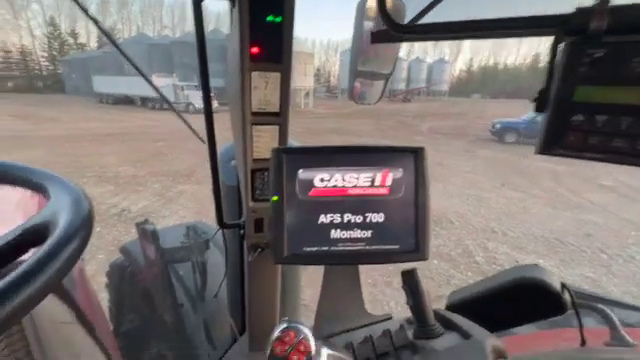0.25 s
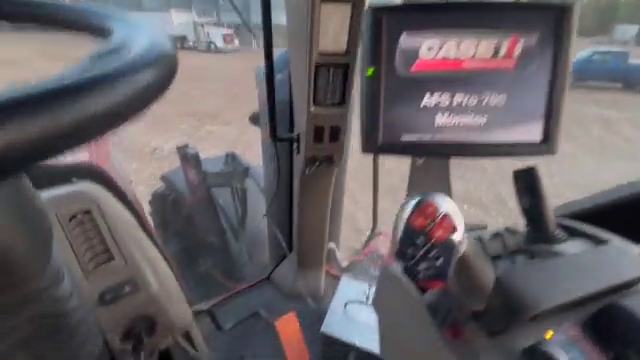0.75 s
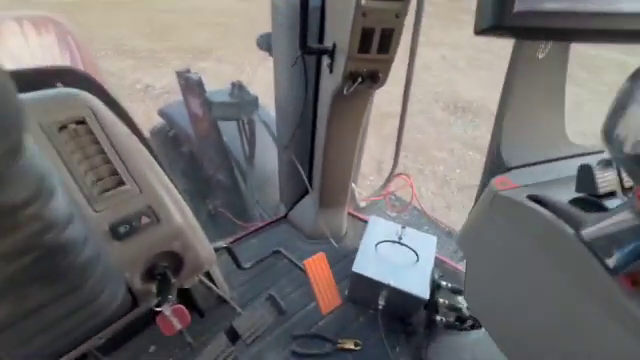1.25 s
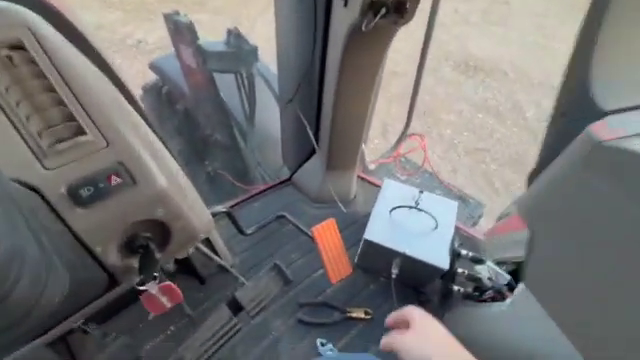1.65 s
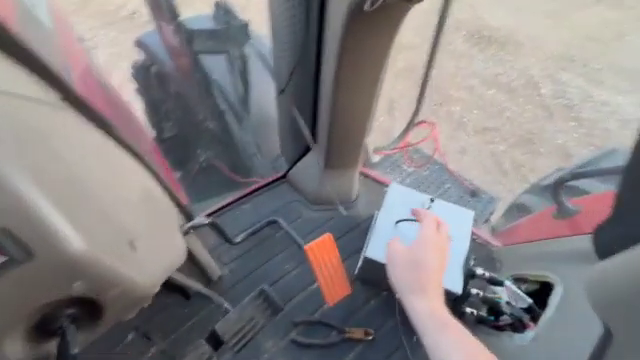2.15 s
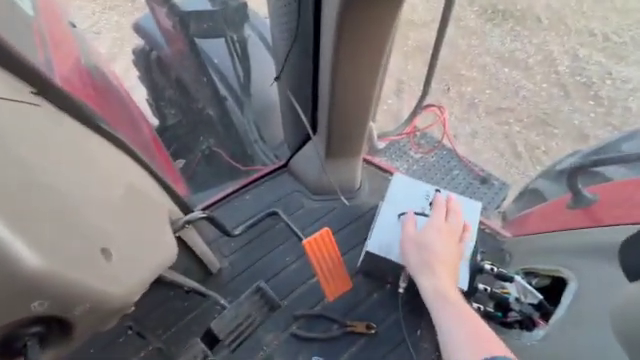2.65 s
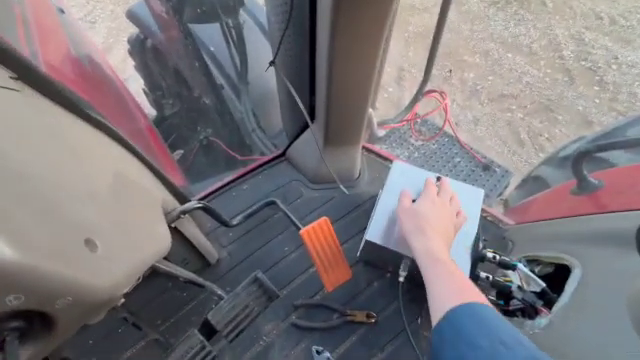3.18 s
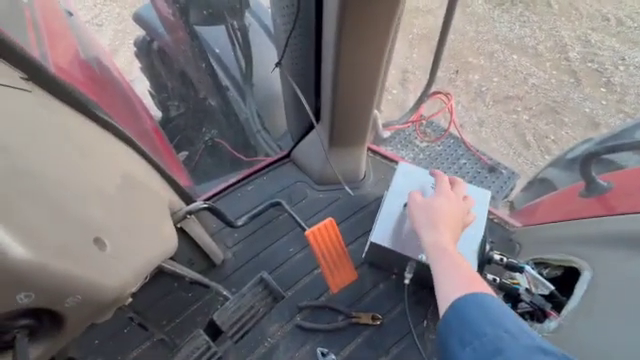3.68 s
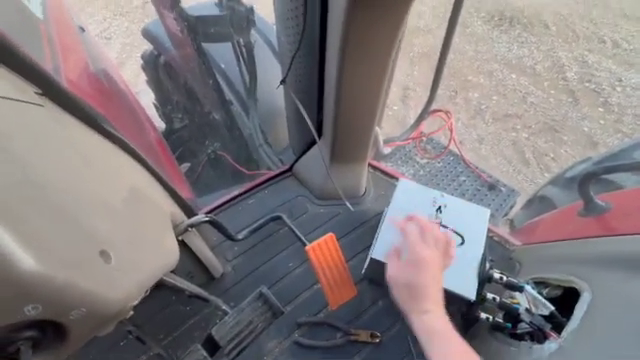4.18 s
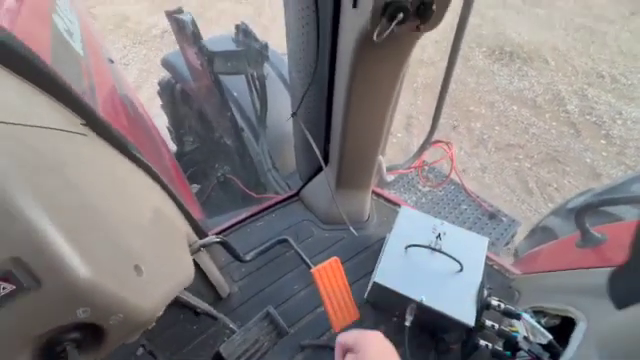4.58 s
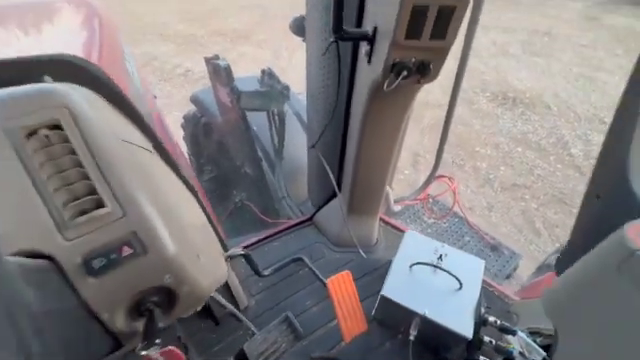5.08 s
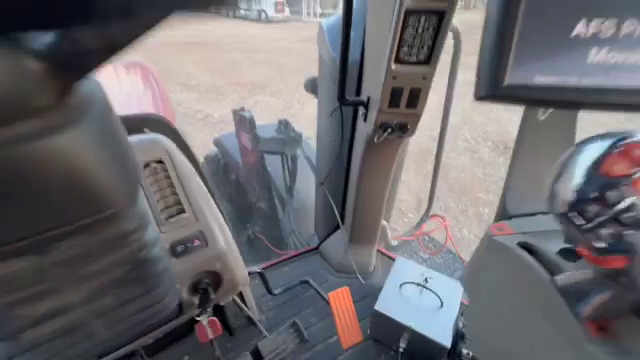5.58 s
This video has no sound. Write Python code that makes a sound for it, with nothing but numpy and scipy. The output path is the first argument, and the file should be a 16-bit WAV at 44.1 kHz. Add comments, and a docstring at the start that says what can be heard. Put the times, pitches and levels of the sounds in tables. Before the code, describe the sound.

From 0 s a six-cylinder diesel idles under a tractor cab with its door open: low rumble throbbing about 43 times a second, uneven metallic clatter, wavering pump and blower hums. A faint thin whine near 1.5 kHz swells around 0.3 s and fades. Small ticks come at about 0.9, 1.4 and 1.8 s; sleeve and seat cloth rub softly, most clearly near 1.5-1.6 s and again about 2.8 s. The hum shifts as the listener bends down. At 3.78-3.84 s a switch snaps and a kick and clank ring a sheet-metal box. A small piston compressor surges up within a tenth of a second into a loud, buzzing, many-toned whine with rapid valve slaps and pulsing air hiss. Its pitch sags slightly as pressure builds. From about 4.3 to 5.3 s, as the listener sits up, hiss and low tones weaken and the whine changes colour, continuing to the end at 5.8 s.

```python
"""A small piston compressor in a sheet-metal box on a tractor cab floor kicks, clanks and whines at 3.8 s:
noise bursts ring the box, then clean shaft multiples, reed-valve slaps and leaking air take over.
Its tone colour shifts as the hand lifts and the listener sits up: panel, path and casing levels follow time.
A six-cylinder diesel idles under the cab, its door open: noise throbbing per firing, ringing block modes,
wavering tones for orders, pumps and a blower. Sleeve and seat cloth rub as shaped noise; ticks are bursts."""
import sys
import numpy as np
from scipy import signal
from scipy.fft import rfft, irfft
from scipy.io import wavfile

SR = 44100
rng = np.random.default_rng(int(sys.argv[2]) if len(sys.argv) > 2 else 0)


def inscribe(sig):
    """Save sig as 16-bit PCM at rate SR to the path in sys.argv[1].

    A 1-D sig is mono; a 2-D sig holds one channel per row.
    Samples are clipped to [-1, 1] before scaling.
    """
    pcm = np.round(np.clip(np.atleast_2d(sig).T, -1, 1) * 32767)
    wavfile.write(sys.argv[1], SR, pcm.astype(np.int16))


def rack_gain(trim_db):
    """Turn a fader trim in dB into the linear factor to multiply a signal by."""
    fader = np.asarray(trim_db, float)
    return 10 ** (fader / 20)


N = 257089
TIME = np.arange(N) / SR


def rms_one(x):
    """Scale to rms 1."""
    return x / np.sqrt(np.mean(x ** 2) + 1e-20)


def in_time(rows):
    """Interpolate the columns of a (time, ...) table at every sample."""
    time_s, *columns = np.transpose(rows)
    return [np.interp(TIME, time_s, column) for column in columns]


def at_hz(points, hz):
    """Read a spectrum on a log-frequency axis."""
    points_hz, values = np.transpose(points)
    return np.interp(np.log(hz), np.log(points_hz), values)


def ramp(start_s, takes_s):
    """Linear rise from 0 to 1."""
    return np.clip((TIME - start_s) / takes_s, 0, 1)


def drift(rate_hz):
    """Slow random wander of spread 1: low-passed noise, drawn every 40 samples."""
    r = np.exp(-80 * np.pi * rate_hz / SR)
    white = rng.standard_normal(N // 40 + 4002)
    slow = signal.lfilter([1], [1, -2 * r, r * r], white)[4000:]   # settled part
    return np.interp(np.arange(N) / 40, np.arange(len(slow)), rms_one(slow))


def resonance(x, hz, width_hz):
    """Two-pole resonance with peak gain 1."""
    r = np.exp(-np.pi * width_hz / SR)
    poles = [1, -2 * r * np.cos(2 * np.pi * hz / SR), r * r]
    return signal.lfilter([(1 - r * r) / 2, 0, (r * r - 1) / 2], poles, x)


def band(x, low_hz, high_hz):
    """Butterworth band-pass."""
    sos = signal.butter(2, [low_hz, high_hz], "band", fs=SR, output="sos")
    return signal.sosfilt(sos, x + 1e-18)


def throb(cycles, depth, sharp):
    """Gate that peaks at the start of each cycle and dies away."""
    return 1 + depth * np.exp(-sharp * (cycles % 1))


# ear balance: (frequency [Hz], left minus right [dB])
EAR_BALANCE = [(60, 0), (110, 4), (200, 3), (380, 2.5), (700, 1), (1290, 2), (2380, 4), (4400, 6.5),
               (8120, -3), (15000, -3)]


def balance_db(hz):
    """Level offset of the left and right ear, half the difference each."""
    return at_hz(EAR_BALANCE, hz) * np.array([[.5], [-.5]])


# ear correlation: (frequency [Hz], left-right likeness [-])
EAR_LIKENESS = [(45, 0.88), (65, 0.78), (180, 0.62), (330, 0.5), (640, -0.4), (1650, -0.28), (3000, 0.051),
                (6400, 0.037), (9800, -0.36), (14000, 0.43)]


def likeness(hz):
    """Left-right correlation at a frequency."""
    return np.clip(at_hz(EAR_LIKENESS, hz), -1, 1)


def coloured(spectrum, gate=1):
    """Gated stereo noise, shaped in spectrum, ear correlation and balance; rms 1."""
    hz = np.maximum(np.fft.rfftfreq(N, 1 / SR), 1)
    mid, side = rfft(gate * rng.standard_normal((2, N)))
    alike = likeness(hz)
    ears = np.sqrt(1 + alike) * mid + np.sqrt(1 - alike) * side * [[1], [-1]]
    return rms_one(irfft(ears * rack_gain(at_hz(spectrum, hz) + balance_db(hz)), N))


# engine block and cab panel modes, levels at loudest clatter, before balance and swell:
# (frequency [Hz], level [dB rms])
BLOCK_MODES = [(1145, -50.5), (1270, -50.5), (1600, -54), (1720, -57.5), (2090, -59), (2290, -59),
               (2840, -61)]


def block(firings, cylinder):
    """Uneven firing knocks ring the block's modes; each mode swells and fades on its own."""
    knocks = throb(firings, 1.4 * cylinder, 6.6) * rng.standard_normal((2, N))
    out = 0
    for hz, db in BLOCK_MODES:
        ears_db = db + balance_db(hz) + 3.5 * drift(2.25)
        out = out + rack_gain(ears_db) * rms_one(resonance(knocks, hz, width_hz=42))
    return out


# engine orders, pumps and blower, levels at loudest rumble, before balance and swells:
# (frequency [Hz], pitch spread [Hz], upright [dB rms], leaning [dB rms], bent [dB rms])
HUM_TONES = [(42.2, 0.54, -45.5, -36, -42), (71.1, 2.42, -42, -52, -43), (92.25, 2.9, -52, -38.5, -37.5),
             (108.3, 5.05, -38, -49, -42.5), (125.9, 3.04, -44, -44, -43.5), (157.2, 1.2, -55, -45.5, -46),
             (241, 1.1, -41.5, -47, -58), (282.3, 1.15, -47, -39.5, -49.5), (312.6, 1.26, -48, -41.5, -47),
             (456, 2.74, -48, -48, -45.5), (705, 5.18, -47, -51, -43)]
# listener upright, leaning, bent to the floor, upright again: (time [s])
HEAD_S = [.7, 1.9, 3.2, 5.3]


def hums():
    """Tones of wavering pitch and slowly swelling level; ear phase follows the likeness."""
    out = 0
    for hz, spread_hz, upright_db, leaning_db, bent_db in HUM_TONES:
        db = np.interp(TIME, HEAD_S, [upright_db, leaning_db, bent_db, upright_db])
        swell_db = 1.8 * drift(1.6) + 2.5 * drift(7.6)
        phase = 2 * np.pi * np.cumsum(hz + spread_hz * drift(4.125)) / SR
        lead = np.arccos(likeness(hz))
        ears = np.sin(phase + [[lead], [0]]) * rack_gain(balance_db(hz))
        out = out + np.sqrt(2) * rack_gain(db + swell_db) * ears
    return out


def whine():
    """Thin whine: noise through two narrow resonances, swelling and fading early on."""
    hz, width_hz, level_db, peak_s, spread_s = 1508, 16, -44, 0.26, 0.18
    narrow = resonance(rng.standard_normal((2, N)), hz, width_hz)
    tone = rms_one(resonance(narrow, hz, 2 * width_hz))
    return rack_gain(level_db) * tone * np.exp(-.5 * ((TIME - peak_s) / spread_s) ** 2)


# idle: (time [s], rumble level before a 1.64 dB lift [dB], clatter level [dB])
IDLE = [(0.0, -34.5, -33), (3.62, -33, -33), (4.95, -37, -36), (5.83, -34.5, -52)]
# rumble spectrum: (frequency [Hz], density [dB per Hz])
RUMBLE = [(15, -46), (25, -16), (48, -7), (65, -1.5), (102, -0.5), (119, -1), (202, -11), (243, -2),
          (316, -7), (339, -8.5), (384, -18.5), (626, -5), (700, -13), (910, -47), (1540, -120)]
# clatter spectrum: (frequency [Hz], density [dB per Hz])
CLATTER = [(240, -13), (400, -0.5), (616, -7.5), (676, -1.5), (964, -3.5), (1160, -4.5), (1380, -6),
           (1510, -9), (1750, -13), (2900, -22), (3100, -27.5), (5050, -29.5), (5250, -31.5), (9040, -37),
           (16000, -103.5)]


def engine():
    """Each firing shakes the cab and knocks; the cylinders differ in strength."""
    rumble_db, clatter_db = in_time(IDLE)
    firing_hz = 42.8 * (1 + 0.0053 * drift(1.3))
    firings = np.cumsum(firing_hz) / SR
    cylinder_db = np.array([-2.5, -15.5, -10.0, -10.0, 0.0, -1.0])
    cylinder = rack_gain(cylinder_db[firings.astype(int) % 6] + 2.1 * drift(6.1))
    rumble = rack_gain(rumble_db + 1.64) * coloured(RUMBLE, throb(firings, 0.1 * cylinder, 10.0))
    clatter = rack_gain(clatter_db) * coloured(CLATTER, throb(firings, 0.31 * cylinder, 1.1))
    knocks = block(firings, cylinder) * rack_gain(clatter_db - clatter_db.max())
    tones = hums() * rack_gain(rumble_db - rumble_db.max())
    return rumble + clatter + knocks + tones + whine()


# strokes of sleeve and seat cloth; a negative fade keeps growing past its time:
# (time [s], level then [dB], swell per 10 dB [s], fade per 10 dB [s])
RUBS = [(.5, -50, .5, 0.2), (1.52, -42.5, 0.07, 0.03), (1.605, -43, 0.09, 0.4), (2.1, -50, 0.65, .5),
        (2.76, -45.5, 0.42, 0.1), (3.34, -49, 0.98, -3.5)]
# cloth spectrum: (frequency [Hz], density [dB per Hz])
CLOTH = [(1760, -25), (3000, -1), (4000, 2.5), (4470, 7), (7150, -2), (9460, 11), (11000, -3), (16000, -3)]


def cloth():
    """Rubbing strokes of clumped fine grains over a faint rest level."""
    rest_db, strokes_stop_s = -65.5, 3.4
    power = 0
    for s, db, swell_s, fade_s in RUBS:
        fall = np.maximum((s - TIME) / swell_s, (TIME - s) / fade_s)
        power = power + rack_gain(db - 10 * fall) ** 2
    power = power * (TIME < strokes_stop_s) + rack_gain(rest_db) ** 2
    return np.sqrt(power) * coloured(CLOTH, rack_gain(1.3 * drift(28)))


# ticks as the listener moves:
# (time [s], level before band-pass [dB], decay t60 [s], low edge [Hz], high edge [Hz])
TICKS = [(.885, -36.5, 0.3, 7760, 10300), (1.4294, -29, 0.0088, 2500, 10000),
         (1.785, -35, 0.067, 3000, 8000)]


def ticks():
    """Short decaying noise bursts, band-passed."""
    out = np.zeros((2, N))
    for s, db, t60_s, low_hz, high_hz in TICKS:
        after_s = np.maximum(TIME - s, 0)
        envelope = rack_gain(db - 60 * after_s / t60_s) * (after_s > 0)
        out += band(envelope * rng.standard_normal((2, N)), low_hz, high_hz)
    return out


# start-up blows on the box:
# (time [s], level before band-pass and box [dB], decay t60 [s], low edge [Hz], high edge [Hz])
BLOWS = [(3.778, -21, 0.17, 4800, 13700), (3.784, -21, 0.34, 249, 2840), (3.822, -8, 0.07, 1750, 14000),
         (3.826, -10, 0.17, 254, 1620)]
# box modes: (frequency [Hz], width [Hz], gain [dB])
BOX_MODES = [(314, 124, 21), (475, 13, 20), (987, 128, 21.5), (1910, 24, 6), (2620, 90, 8)]
# panels jolted by switch, rotor and piston:
# (peak time [s], spread [s], frequency [Hz], peak before ear balance [dB])
SHUDDERS = [(3.7875, 0.003, 1070, -22), (3.797, 0.0056, 277, -18.5), (3.812, 0.0043, 1010, -5.5),
            (3.832, 0.013, 1048, -15), (3.838, 0.0087, 467, -13)]


def start_up():
    """Switch snap, relay, rotor kick and piston clank ring the sheet-metal box."""
    blows = np.zeros((2, N))
    for s, db, t60_s, low_hz, high_hz in BLOWS:
        after_s = np.maximum(TIME - s, 0)
        envelope = np.minimum(after_s / 0.002, 1) * rack_gain(db - 60 * after_s / t60_s)   # 2 ms rise
        burst = envelope * rng.standard_normal((2, N))
        burst = 0.2 * burst.mean(axis=0) + 0.5 * burst   # partly common to both ears
        burst[:, round(s * SR)] += 0.87 * rack_gain(db)   # hard first contact
        blows += band(burst, low_hz, high_hz)
    blows *= 0.69
    ringing = sum(rack_gain(db) * resonance(blows, hz, width_hz) for hz, width_hz, db in BOX_MODES)
    shudder = np.zeros(N)
    for s, spread_s, hz, db in SHUDDERS:
        envelope = rack_gain(db) * np.exp(-.5 * ((TIME - s) / spread_s) ** 2)
        shudder += envelope * np.sin(2 * np.pi * hz * (TIME - s))
    return blows + ringing + shudder * rack_gain([[-1.5], [1.5]])


SWITCH_ON_S = 3.83
SINCE_ON_S = np.maximum(TIME - SWITCH_ON_S, 0)
# shaft speed as pressure builds, before the spin-up deficit: (time [s], speed [turns/s])
PUMP_SPEED = [(3.95, 79.3), (4.17, 80.3), (4.36, 79.2), (4.5, 78.85), (4.65, 77.9), (4.84, 77.8),
              (5.03, 76.8), (5.17, 76.95), (5.3, 76.55), (5.42, 76.65), (5.55, 76.6), (5.7, 76.25),
              (5.83, 76.2)]


def shaft():
    """Shaft speed [turns/s] and jittered turns; starts 10 turns/s slow and catches up."""
    speed = in_time(PUMP_SPEED)[0] - 10 * np.exp(-SINCE_ON_S / 0.042)
    return speed, np.cumsum(speed * (1 + 0.0010 * drift(15.6))) / SR


# shaft multiples from the fourth up: (level before panels, paths, flutter and surge [dB rms])
SHAFT_ORDERS_DB = (-41.5, -39.5, -44, -43, -41.5, -47.5, -41, -43.5, -27.5, -39.5, -37, -35.5, -47.5,
                   -46, -52, -43, -54.5, -54, -51, -57.5, -64.5, -54.5, -57.5, -54.5, -57)
# bent over the box, rising, seated: (time [s])
POSTURE_S = [4.25, 4.78, 5.3]
# panel modes that lift a multiple crossing them:
# (frequency [Hz], width [Hz], bent over the box [dB], rising [dB], seated [dB])
PANEL_MODES = [(317, 36, 2.5, -11, 10.5), (471.4, 7.3, 10, 11, -14), (859.3, 39, 19, 17.5, 17),
               (946, 8.5, 17.5, 8.5, 17), (1035, 30, 21, 16, -3), (1076, 20, 9, 10, 15),
               (1209.4, 5, 23.5, 2, 19), (1277, 4.4, 24, 2, 32), (1358, 29, 11, 18, 14.5),
               (1505, 34, 16, 15, 15), (1568, 42, 19, 17.5, 21.5), (1768, 6.6, 7, 22, 9),
               (1920, 36, -6, -7, 14.5), (2020, 16, 5, 11, -7), (2185, 55, -8, 18, 5)]
# left-ear delays after its direct sound:
# (time [s], floor [ms], door [ms], console [ms], left minus right [dB])
LEFT_PATHS = [(3.95, 0.51, 5.635, 2.894, 0), (4.25, 0.43, 5.63, 2.72, 2.5), (4.5, 0.5, 6, 2.45, -2.5),
              (4.75, 0.49, 6.6, 2.64, -1.5), (5.0, 0.49, 6.43, 2.934, -0.5), (5.3, 0.47, 6.3, 2.77, -1.5),
              (5.8, 0.44, 6.6, 2.54, -1.5)]
# right-ear delays after the left direct sound:
# (time [s], direct [ms], floor [ms], door [ms], console [ms])
RIGHT_PATHS = [(3.95, -0.37, 0.015, 6.79, 7.56), (4.25, -0.48, -0.0097, 6.55, 7.49),
               (4.5, -0.36, 0.044, 7.14, 7.9), (4.75, -0.22, 0.25, 7.05, 7.59),
               (5.0, -0.21, 0.29, 6.83, 7.25), (5.3, -0.09, 0.38, 7.13, 7.55),
               (5.8, -0.35, -0.046, 6.9, 7.07)]
# floor, door, console: (gain re direct [-])
ECHO_GAINS = [0.74, 0.35, 0.35]


def shaft_tones(speed, turns, risen):
    """Clean shaft multiples, lifted by panel modes and combed by cab echoes; louder while speed gathers."""
    bass_loss_db, bass_under_hz = -25, 840   # full loss towards 0 Hz, none above the limit
    diffuse_from_hz, diffuse_per_khz = 1494, 2.6
    on = slice(int(SWITCH_ON_S * SR), N)
    coarse_s, coarse_speed, coarse_risen = (x[on][::64] for x in (TIME, speed, risen))
    *left_ms, turn_db = in_time(LEFT_PATHS)
    paths_ms = np.array([[0 * TIME] + left_ms, in_time(RIGHT_PATHS)])
    paths_s = paths_ms[..., on][..., ::64] / 1000
    gains = np.array([1, *ECHO_GAINS])[:, None]
    tones = np.zeros((2, N))
    for multiple, db in enumerate(SHAFT_ORDERS_DB, start=4):
        hz = multiple * coarse_speed
        lift_power = 1
        for mode_hz, width_hz, *lifts_db in PANEL_MODES:
            lift = rack_gain(np.interp(coarse_s, POSTURE_S, lifts_db))
            lift_power = lift_power + lift ** 2 / (1 + (2 * (hz - mode_hz) / width_hz) ** 2)
        near_db = bass_loss_db * coarse_risen * np.clip(1 - hz / bass_under_hz, 0, 1)
        echoes = (gains * np.exp(-2j * np.pi * hz * paths_s)).sum(axis=1)
        # scattered sound, in a phase of its own at each ear
        scatter = diffuse_per_khz * np.maximum(hz - diffuse_from_hz, 0) / 1000
        diffuse = scatter * np.exp(2j * np.pi * rng.random((2, 1)))
        ears = rack_gain(db + near_db) * np.sqrt(lift_power) * (echoes + diffuse)
        # multiples start loosely in step, so each stroke is a pulse
        wave = np.exp(2j * np.pi * (multiple * turns[on] + 0.47 * rng.random()))
        for ear in range(2):
            # scattered cab sound makes each multiple swell at random
            flutter = rack_gain((0.2 + 0.03 * multiple) * drift(5.4)[on])
            heard = (np.interp(TIME[on], coarse_s, ears[ear]) * wave).imag
            tones[ear, on] += np.sqrt(2) * flutter * heard
    surge_db = 8.5 * np.exp(-SINCE_ON_S / 0.047)   # the motor labours
    return tones * rack_gain(turn_db * [[.5], [-.5]] + surge_db)


def upper_tones(turns):
    """Weak upper multiples whose levels wander at random, separately at each ear."""
    tones = np.zeros((2, N))
    for k in range(14):
        ears_db = -55 - 0.16 * k + 4.2 * np.array([drift(0.66), drift(2.8)])
        multiple = len(SHAFT_ORDERS_DB) + 4 + k
        phase = 2 * np.pi * (multiple * turns + rng.random((2, 1)))
        tones += np.sqrt(2) * rack_gain(ears_db) * np.sin(phase)
    return tones


# cylinder head and casing modes, relative levels:
# (frequency [Hz], width [Hz], bent over the box [dB], rising [dB], seated [dB])
CASING_MODES = [(2614, 230, -6, -3, 2), (2824, 75, 2, 5.5, -7), (4145, 224, -8, 4.5, -4.5),
                (4620, 160, -8, 3, 1), (4960, 220, 3, 6, 2), (6480, 450, -5, -3.5, -12)]


def valves(turns):
    """Two reed valves slap once a turn; slaps and escaping air ring the casing; rms 1."""
    strike = 0.012 * rng.standard_normal((2, N)) * throb(turns, 0.28, 2.7)
    for lag_turns, db in [(0, 0.5), (0.37, -6.5)]:
        cycle = np.floor(turns - lag_turns + 0.0015 * drift(30))
        at = np.flatnonzero(np.diff(cycle) > 0)
        strike[:, at] += rack_gain(db + 0.99 * rng.standard_normal(len(at)))
    out = 0
    for hz, width_hz, *levels_db in CASING_MODES:
        ringing = resonance(resonance(strike, hz, width_hz), hz, 0.89 * width_hz)
        ears_db = balance_db(hz) + 1.6 * np.array([drift(4.0), drift(3.0)])
        out = out + rack_gain(np.interp(TIME, POSTURE_S, levels_db)) * rack_gain(ears_db) * ringing
    return rms_one(out)


# noise spectrum as heard, with a gap near 11 kHz that is not the air's own:
# (frequency [Hz], density [dB per Hz])
NOISE_AS_HEARD = [(200, -18), (300, -13), (520, -26.5), (900, -9.5), (1500, -12.5), (3000, -24.5),
                  (5000, -18), (5300, -22.5), (7300, -26.5), (9800, -22), (10600, -39), (11800, -44.5),
                  (12600, -26), (16000, -37)]


def leaking_air(turns):
    """Leaking air: noise that throbs once a turn; rms 1."""
    return coloured(NOISE_AS_HEARD, throb(turns, 0.65, 2.8) * rack_gain(0.88 * drift(10.0)))


def compressor():
    """The shaft drives tones, valves and leaking air; sitting up loses air noise and low multiples."""
    speed, turns = shaft()
    risen = ramp(4.35, 1)
    tones = shaft_tones(speed, turns, risen) + upper_tones(turns)
    air = rack_gain(-27.5) * leaking_air(turns) + rack_gain(-37.5) * valves(turns)
    air *= rack_gain(-5 * risen)
    return ramp(SWITCH_ON_S, 0.053) ** 2 * tones + ramp(SWITCH_ON_S, 0.011) * air


def scene():
    """Everything heard in the cab."""
    return engine() + cloth() + ticks() + start_up() + compressor()


def roll_off(x):
    """The treble ends steeply here."""
    return signal.sosfilt(signal.butter(12, 15870, fs=SR, output="sos"), x)


def record(dry):
    """The microphone loses the deepest bass, below 32 Hz."""
    mix = signal.sosfilt(signal.butter(2, 32, "high", fs=SR, output="sos"), dry)
    return roll_off(mix)


dry = scene()
out = record(dry)
inscribe(out)
```